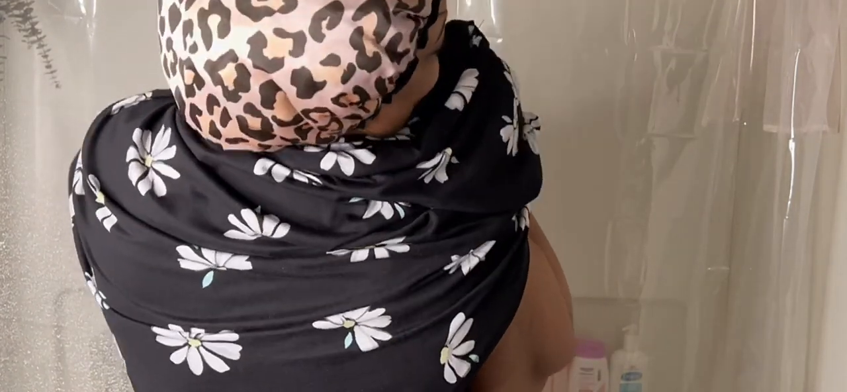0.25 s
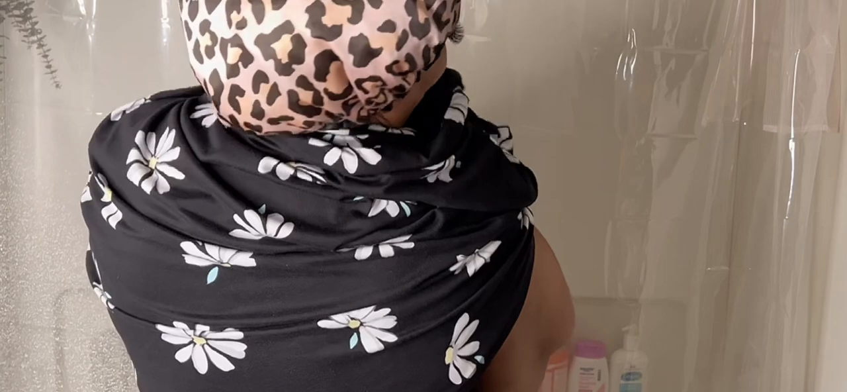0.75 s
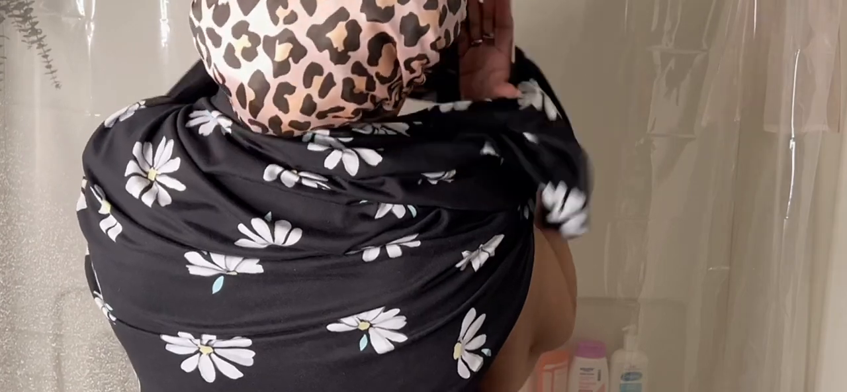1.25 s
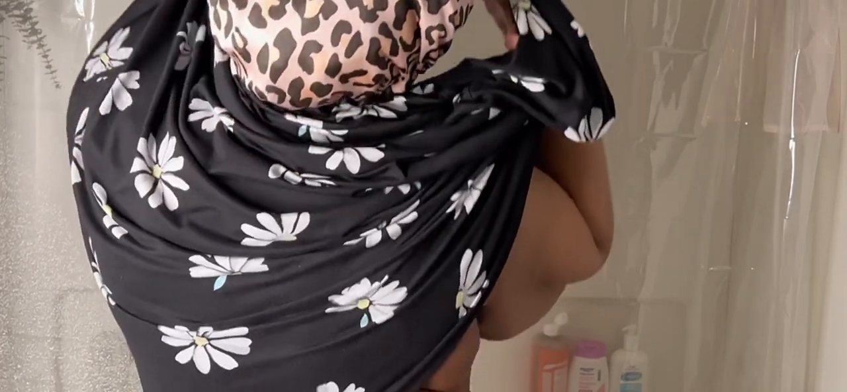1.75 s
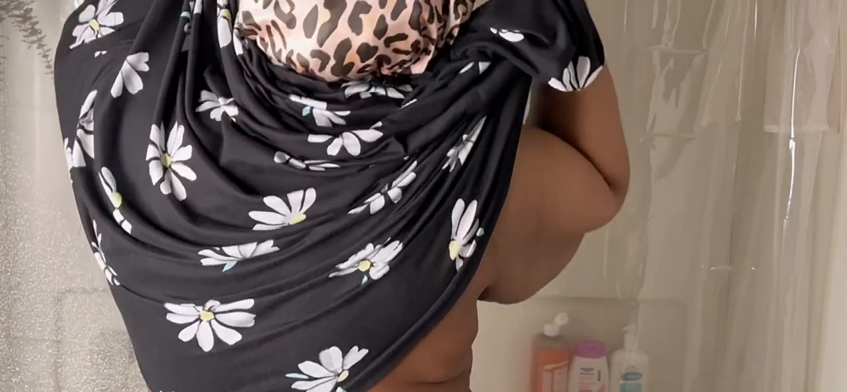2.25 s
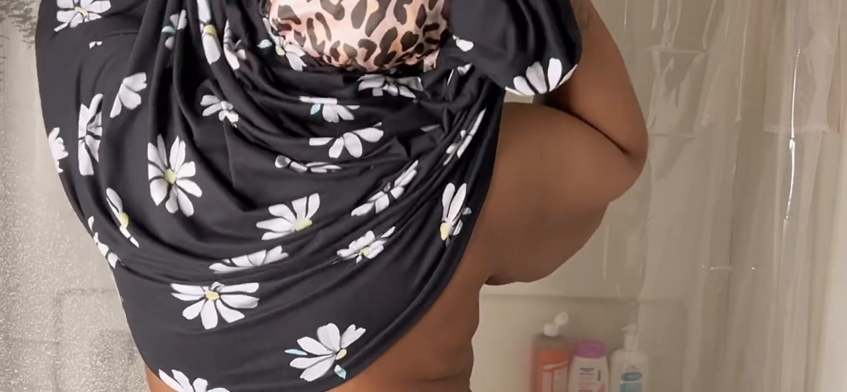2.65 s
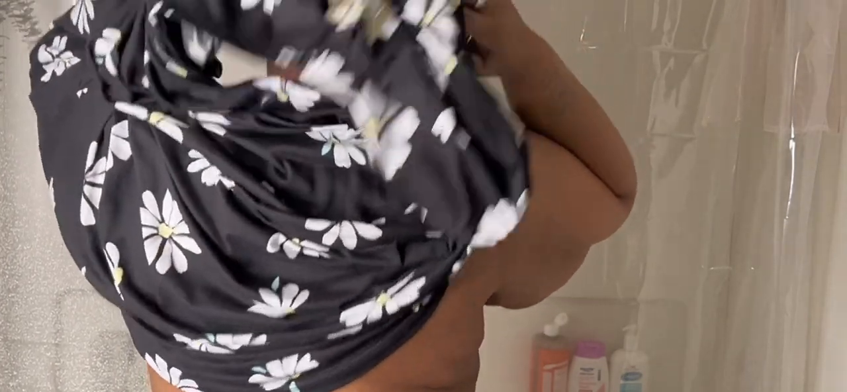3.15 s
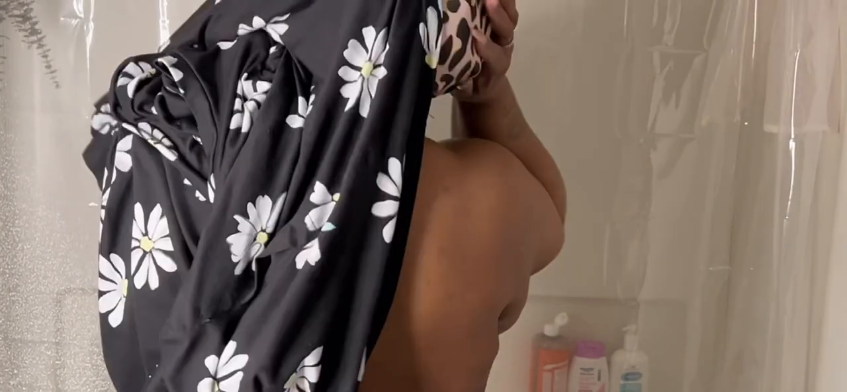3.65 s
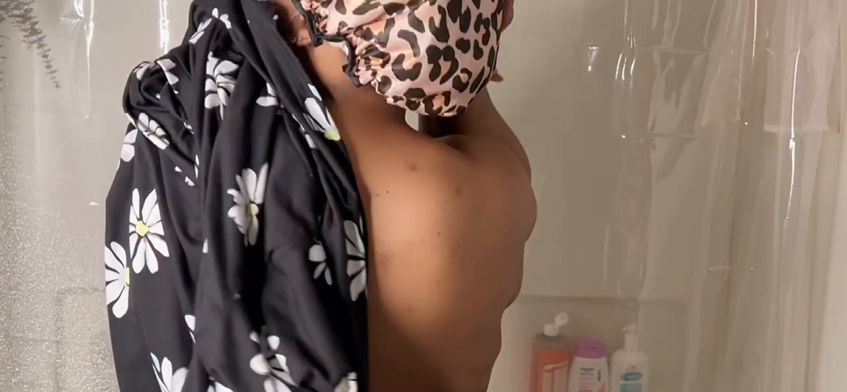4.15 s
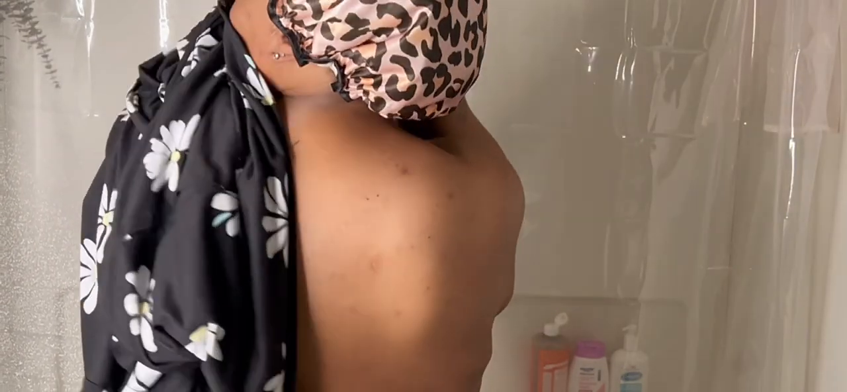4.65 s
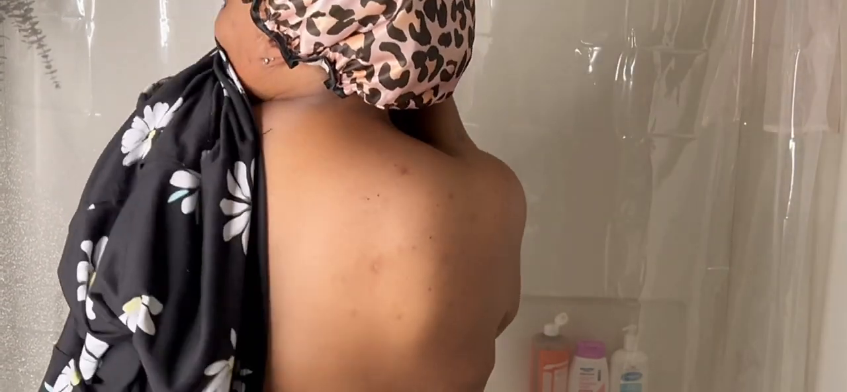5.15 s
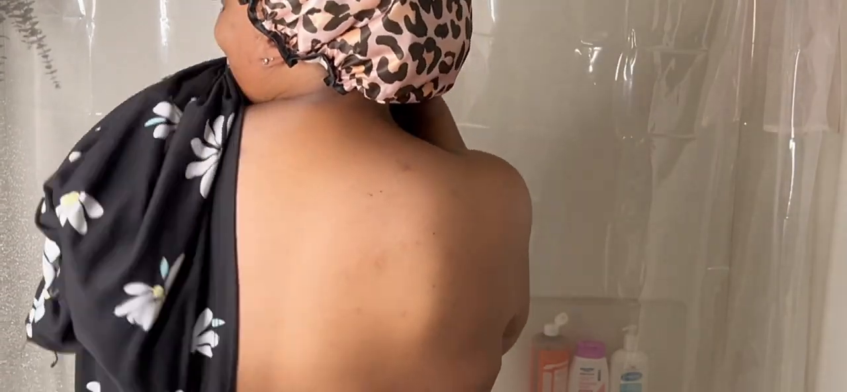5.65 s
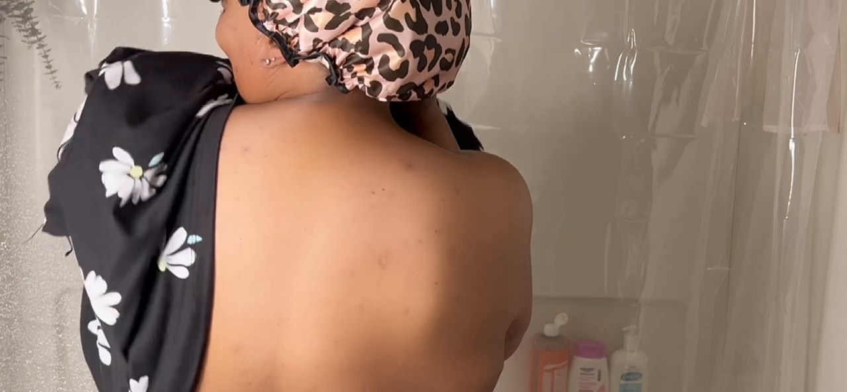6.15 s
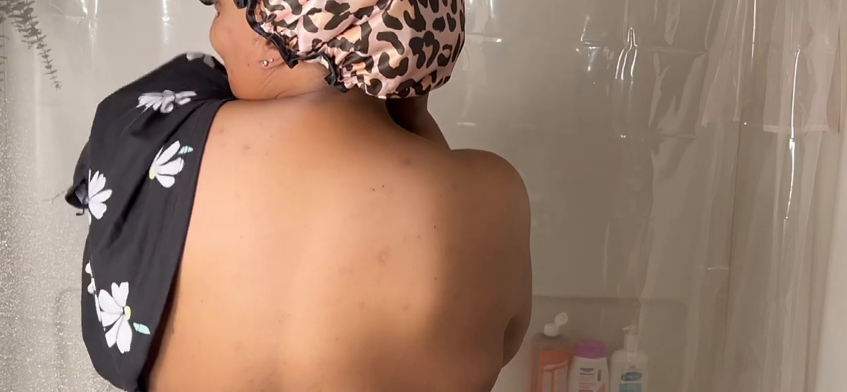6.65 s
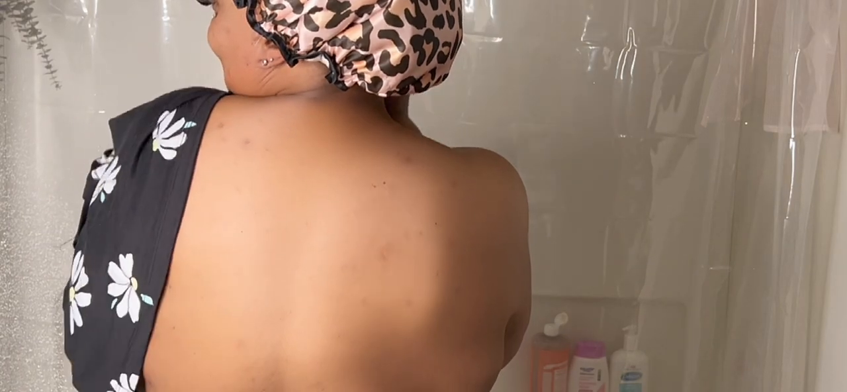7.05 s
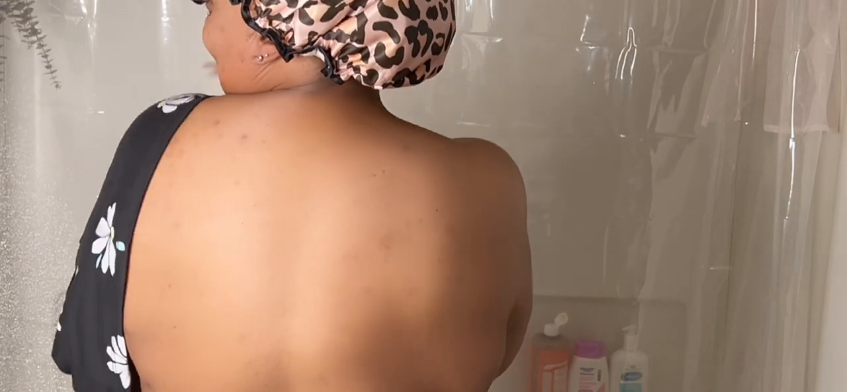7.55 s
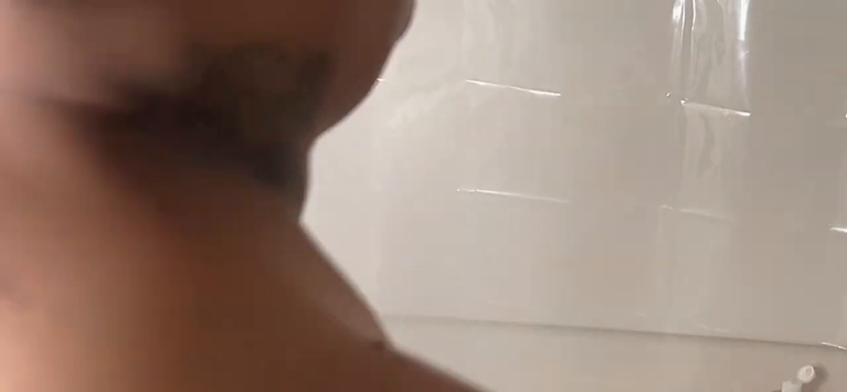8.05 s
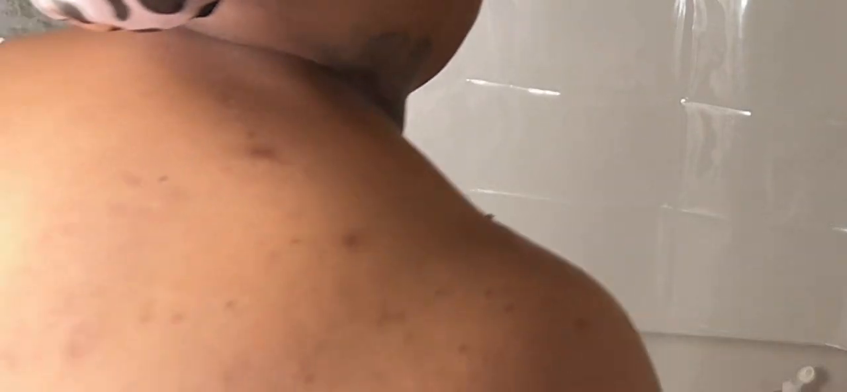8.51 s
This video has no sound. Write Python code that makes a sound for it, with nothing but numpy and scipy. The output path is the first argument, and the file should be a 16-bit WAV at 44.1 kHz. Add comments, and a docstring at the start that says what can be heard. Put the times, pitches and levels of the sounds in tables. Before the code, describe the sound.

Steady shower water drums and fizzes in a tub enclosure until it stops abruptly; after a silent gap, faint room hiss and two small drips.

```python
"""A shower runs in a small hard-walled bathroom: random drop impacts ring modes of tub and stall,
patter as shaped noisy clicks on the curtain and fizz on wet surfaces as crackle and tiny bubbles.
Now and then a bubble plips, or a splash climbs in pitch as it fades; one knock sounds on the tub.
The sound stops dead; after a silence there is only a faint, grainy hiss with two tiny drips."""
import sys
import numpy as np
from scipy import signal
from scipy.fft import rfft, irfft, next_fast_len
from scipy.io import wavfile

SR = 44100
rng = np.random.default_rng(int(sys.argv[2]) if len(sys.argv) > 2 else 0)


def output_pcm(signal):
    """Save a mono or channel-first signal as 16-bit PCM at the path in sys.argv[1].

    Samples are clipped to [-1, 1] before scaling.
    """
    pcm = np.clip(np.atleast_2d(signal).T, -1, 1) * 32767
    wavfile.write(sys.argv[1], SR, np.round(pcm).astype(np.int16))


N = 387188
TIME = np.arange(N) / SR
SIZE = next_fast_len(N + SR // 2, real=True)
HZ = np.maximum(np.arange(SIZE // 2 + 1) * SR / SIZE, 1)
STOP_S, AIR_START_S = 7.857, 8.657
STEP = 32   # samples per step of a splash envelope


def from_db(db):
    """Decibels to amplitude gain."""
    return 10 ** (np.asarray(db) / 20)


def rms_one(x):
    """Scale to unit power."""
    return x / np.sqrt(np.mean(x ** 2) + 1e-20)


def over_hz(points):
    """Read a table at every frequency, on a log axis."""
    hz, value = np.transpose(points)
    return np.interp(np.log(HZ), np.log(hz), value)


def level_over_time(level_points):
    """Gain interpolated in dB from columns time_s, level_db."""
    time_s, level_db = level_points
    return from_db(np.interp(TIME, time_s, level_db))


def band_shares(centres_hz):
    """Crossfading band weights that sum to 1 at every frequency."""
    for share in np.eye(len(centres_hz)):
        yield np.interp(np.log(HZ), np.log(centres_hz), share)


def panned(left_minus_right_db):
    """Left and right gains for a level difference, at constant power."""
    gains = from_db(np.array([[.5], [-.5]]) * left_minus_right_db)
    return gains / np.sqrt(np.mean(gains ** 2, axis=0))


def resonance(hz, width_hz):
    """Power response of one mode, 1 at its top."""
    return 1 / (1 + ((HZ ** 2 - hz ** 2) / (HZ * width_hz)) ** 2)


# likeness of the two microphone ports, long waves reach both alike: pitch_hz, likeness [-1..1]
PORT_LIKENESS = [(60, 1), (150, 0.81), (240, 0.9), (320, 0.93), (420, 0.39), (550, 0.32), (750, -0.18),
                 (1200, 0.27), (1600, -0.25), (2500, -0.03)]
PORT_LAG_S = .000252


def at_ports(pair, response, beamed=0):
    """Colour two unrelated signals and blend them at the ports; a beamed part reaches the left later."""
    right, other = rfft(pair, SIZE)
    lagged = beamed * np.exp(-2j * np.pi * HZ * PORT_LAG_S)
    shared = over_hz(PORT_LIKENESS) + lagged
    unshared = np.sqrt(np.clip(1 - abs(shared) ** 2, 0, 1))
    left = shared * right + unshared * other
    return rms_one(irfft(np.array([left, right]) * response, SIZE)[:, :N])


def drops(per_s, spread_db):
    """Impacts at random moments, their sizes scattered in dB within two spreads."""
    sizes = from_db(spread_db * np.clip(rng.standard_normal(N), -2, 2))
    return sizes * (rng.random(N) < per_s / SR)


def impacts(per_s, spread_db, wash_db):
    """Two streams of drop clicks, each in a smooth noise wash that stands for its echoes."""
    clicks = np.array([drops(per_s, spread_db) for side in range(2)])
    clicks *= rng.choice([-1, 1], (2, N))
    return rms_one(clicks) + from_db(wash_db) * rng.standard_normal((2, N))


def drummed(modes, skirt_hz, per_s):
    """Drops drum on a body; its modes ring, and little passes far from them."""
    power = 0
    for hz, width_hz, db, left_minus_right_db in modes:
        peak = resonance(hz, width_hz) * resonance(hz, skirt_hz)
        power = power + peak * (from_db(db) * panned(left_minus_right_db)) ** 2
    return at_ports(impacts(per_s, spread_db=3, wash_db=0.0), np.sqrt(power))


def wander(pole_hz, spread_db):
    """A gain that strays at random about 1, as the jets shift: low-passed noise in dB."""
    count = SR // 100   # samples per control step
    r = np.exp(-2 * np.pi * pole_hz * count / SR)
    noise = rng.standard_normal(N // count + 202)
    slow = signal.lfilter([1], [1, -2 * r, r * r], noise)[200:]   # settled part only
    path = np.interp(np.arange(N) / count, np.arange(len(slow)), rms_one(slow))
    return from_db(spread_db * path)


def restless(x, pole_hz, spread_db):
    """The jets land on ever different spots, so each range of pitch swells and sinks by itself."""
    spectrum = rfft(x, SIZE)
    out = 0
    for share in band_shares(np.geomspace(500, 4000, 8)):
        out = out + wander(pole_hz, spread_db) * irfft(spectrum * share, SIZE)[:, :N]
    return out


# the drumming on floor, walls and stall briefly swells or sinks:
# top_s, length_s, floor_db, wall_db, stall_db
DRUMMING_ARCHES = [(0.81, 0.16, 2, 2, 1.5), (1.129, .3, 1, 2.5, -0.5), (1.583, 0.35, -1, 0.5, 3.5),
                   (2.3, 0.44, 0, -1, -2.5), (2.72, 0.96, 1.5, -1.5, 1.5), (3.5, 0.54, 2, 1.5, -0.5),
                   (4.942, 0.24, 2.5, 0, 2), (5.114, 0.17, 2, 0.5, 0), (5.355, 0.14, -0.5, 3.5, 0),
                   (6.61, 0.16, 3, -3.5, 0.5), (7.4, .3, 3.5, 1, -1)]


def drumming_arches():
    """Gains of floor, walls and stall, each moved up or down in smooth arches."""
    total_db = 0
    for top_s, length_s, *dbs in DRUMMING_ARCHES:
        arch = np.cos(np.pi * np.clip((TIME - top_s) / length_s, -.5, .5)) ** 2
        total_db = total_db + np.outer(dbs, arch)
    return from_db(total_db)


# level of the drumming on the tub, before the arches: time_s, floor_boom_db, wall_ring_db
TUB_LEVELS = [(0, -46.5, -42), (1.4, -48.5, -43), (2.0, -46.5, -42), (3.5, -46.5, -43), (4.2, -48.5, -42),
              (4.9, -47, -42.5), (5.7, -48, -42.8), (7.8, -47, -42.5)]
# low modes of the tub floor and the room: pitch_hz, width_hz, relative_db, left_minus_right_db
TUB_FLOOR_MODES = [(46.6, 3.5, -2, 1), (71.8, 3.6, 4, -2), (87.3, 20, -4, -4.5), (119.6, 2.6, -6.5, -7.5),
                   (140, 18, -4.5, -4.5)]
# modes of the tub walls and the stall: pitch_hz, width_hz, relative_db, left_minus_right_db
TUB_WALL_MODES = [(216, 7.3, -1.5, 2), (227.5, 9, -3, 1), (236.9, 8, 3, -1), (297, 24, -6, -2.5),
                  (322.5, 17, -5.5, 1), (370.6, 11, -3, -10), (393, 15, -8, 0.5), (423, 14, -8.5, 3),
                  (433, 15, -3, 1), (494.5, 15, -3.5, 3.5), (505, 10, -9, -4), (536.3, 10.3, -0.5, 0),
                  (564, 16, -10.5, 2.5)]


def tub(floor_gain, wall_gain):
    """Drops excite the low floor modes to a boom and the higher wall modes to a ring."""
    time_s, boom_db, ring_db = np.transpose(TUB_LEVELS)
    boom = level_over_time((time_s, boom_db)) * drummed(TUB_FLOOR_MODES, skirt_hz=40, per_s=1200)
    ring = level_over_time((time_s, ring_db)) * drummed(TUB_WALL_MODES, skirt_hz=90, per_s=1800)
    return floor_gain * boom + wall_gain * ring


# stall resonances, freer as the bather turns aside: time_s, lesser_modes_db, main_mode_db
STALL_LEVELS = [(0, -45, -53), (4.2, -46, -54.5), (4.8, -45.3, -49), (7.8, -44, -49)]
# hollow resonances between the stall walls: pitch_hz, width_hz, relative_db, left_minus_right_db
STALL_LESSER_MODES = [(644, 28, 4, 4.5), (697, 30, -0.5, 3.5), (801, 40, 2, -10), (866, 25, -4.5, -7),
                      (922, 18, 3, -1), (993, 24, 3, -0.5), (1096, 20, 3.5, 0), (1122, 24, 5.5, 0),
                      (1173, 30, 4.5, -5), (1229, 18, 5.5, 3), (1282, 26, 3, 4), (1415, 37, -0.5, 1.5),
                      (1480, 45, 2.5, 1), (1603, 41, 2.5, 3.5), (1725, 28, -1, -3), (1800, 25, -0.5, 0.5),
                      (1908, 23, -2.5, -1), (2233, 44, -6, 2)]
# the one that sings out most: pitch_hz, width_hz, relative_db, left_minus_right_db
STALL_MAIN_MODE = [(1336, 23, 0, 0)]


def stall(stall_gain):
    """Drops ring the resonances between the stall walls, each pitch range wavering by itself."""
    time_s, lesser_db, main_db = np.transpose(STALL_LEVELS)
    lesser = drummed(STALL_LESSER_MODES, skirt_hz=159.6, per_s=1500)
    main = drummed(STALL_MAIN_MODE, skirt_hz=120, per_s=1500)
    hollow = level_over_time((time_s, lesser_db)) * lesser
    hollow += level_over_time((time_s, main_db)) * main
    return stall_gain * restless(hollow, pole_hz=15, spread_db=1.3)


# spectrum of the patter: pitch_hz, relative_db
PATTER_SPECTRUM = [(20, -24), (60, -5), (180, -6.5), (350, 0), (560, -3), (720, 1.5), (900, -3),
                   (1150, -3.5), (1350, -2), (1750, -1), (2400, -4.5), (3300, -8.5), (5000, -12.5),
                   (9000, -49)]
# patter and fizz at the two ports: pitch_hz, left_minus_right_db
PORT_BALANCE = [(600, 3), (800, -2), (1100, 4.5), (2400, 0), (4200, 3.5), (5400, 9.5), (6900, 9.5),
                (8200, 5.5), (9200, -0.5)]
PATTER_DB = -41   # before the wandering


def patter():
    """Dense soft taps on the curtain and the film of water, straying in level and colour."""
    clicks = impacts(per_s=1600, spread_db=3.5, wash_db=5.0)
    taps = at_ports(clicks, from_db(over_hz(PATTER_SPECTRUM)) * panned(over_hz(PORT_BALANCE)))
    taps = from_db(PATTER_DB) * wander(pole_hz=9.8, spread_db=0.5) * taps
    return restless(taps, pole_hz=15, spread_db=1.77)


def spatter(per_s, small_db, spread_db):
    """Small splashes or bubbles at random, as rows start_s, pitch_hz, level_db."""
    wait, pitch, size = rng.random((4000, 3)).T
    start_s = np.cumsum(-np.log(1 - wait)) / per_s
    pitch_hz = 2300 * 2 ** (2.7 * pitch)
    level_db = small_db + spread_db * size ** 2
    return np.column_stack([start_s, pitch_hz, level_db])[start_s < STOP_S]


def bubble(hz, db, t60_cycles, glide):
    """One bubble rings out over so many cycles, rising in pitch as it reaches the surface."""
    turns = hz * TIME[:SR // 20]
    fade = from_db(db - 60 * turns / t60_cycles)
    return fade * np.sin(2 * np.pi * turns * (1 + glide * turns / t60_cycles))


def plinks(per_s, t60_cycles):
    """Tiny bubbles ring at pitches of their own, each reaching the two ports differently."""
    out = np.zeros((2, N + SR))
    bubbles = spatter(per_s, small_db=0, spread_db=6)
    reaches = rng.standard_normal((len(bubbles), 2, 1))
    for (start_s, hz, db), reach in zip(bubbles, reaches):
        ring = bubble(hz, db, t60_cycles, glide=0.053)
        start = int(start_s * SR)
        out[:, start:start + len(ring)] += reach * ring
    return rms_one(out[:, :N])


SPLASH_CLIMB_OCTAVES_PER_S = 3.2   # a splash breaks into ever finer drops


def in_room(splashes, centres_hz, rise_s):
    """Energy per band and step: a splash flares, then climbs as it dies away between the walls."""
    energy = np.zeros((len(centres_hz), (N + SR) // STEP))
    t = TIME[:SR // 2:STEP]
    for start_s, hz, db, width_octaves, t60_s in splashes:
        away_octaves = np.log2(centres_hz[:, None] / hz) - SPLASH_CLIMB_OCTAVES_PER_S * t
        near = np.exp(-.5 * (away_octaves / width_octaves) ** 2)
        tail = (1 - np.exp(-(t / rise_s) ** 2)) * 10 ** (-6 * t / t60_s)
        start = int(start_s * SR / STEP)
        energy[:, start:start + len(t)] += from_db(db) ** 2 * near * tail / tail.max()
    return energy


# big splashes: start_s, centre_hz, relative_db, width_octaves, t60_s
BIG_SPLASHES = [(.219, 7570, -0.5, .3, .15), (.358, 5400, 3, .42, .27), (.612, 6530, -4, .7, .25),
                (1.388, 3610, 2.5, .35, .18), (1.743, 4600, 8, .15, .15), (2.023, 3510, 6.5, 0.12, .16),
                (2.054, 9200, 3, 0.17, .3), (2.238, 5300, -0.5, .35, .2), (2.284, 12300, 4.5, 0.22, .28),
                (2.735, 8300, 3.5, 0.11, .4), (2.940, 4900, 1, 0.3, 0.6), (3.090, 2900, 5, 0.11, .12),
                (3.143, 4750, 4, .28, .14), (3.376, 5450, 3.5, 0.25, .3), (3.430, 7520, -1, 0.25, .3),
                (3.701, 8400, 1.5, .3, .22), (3.795, 12500, -0.5, .3, .5), (3.975, 3200, 4, .15, .13),
                (3.991, 11040, 0.5, .7, .3), (4.058, 6500, -1.5, 0.89, .3), (4.115, 4250, 7, 0.14, .18),
                (4.257, 7500, 7, .17, .3), (4.361, 3250, 9, .13, .13), (4.680, 4900, 4.5, 0.11, .17),
                (4.921, 6970, 1, 0.12, .2), (5.438, 11530, 3, 0.25, .26), (5.462, 5480, -3, .6, .25),
                (5.736, 7000, -5, 0.44, .45), (5.778, 10070, -1.5, .15, .5), (6.250, 7030, -0.5, 0.42, .65),
                (6.412, 7200, 0, 0.27, .27), (6.772, 12800, 1.5, .12, .15), (7.282, 6300, 4.5, 0.18, .22),
                (7.284, 10000, -1.5, 0.7, .3), (7.305, 2800, 3.5, .5, .2)]
DROPLET_OCTAVES, ROOM_T60_S = 0.45, 0.2   # small splashes


def splashing():
    """Showers of droplets, small at random and big as listed, flare band by band."""
    centres_hz = np.geomspace(2000, 16000, 16)
    droplets = spatter(per_s=110, small_db=-11.5, spread_db=7.5)
    droplets = [(*row, DROPLET_OCTAVES, ROOM_T60_S) for row in droplets]
    energy = in_room(droplets, centres_hz, rise_s=0.022) + in_room(BIG_SPLASHES, centres_hz, rise_s=0.008)
    swells = np.repeat(np.sqrt(energy), STEP, axis=1)[:, :N]
    shower = rfft(rms_one(impacts(per_s=2200, spread_db=2.5, wash_db=4)), SIZE)
    out = np.zeros((2, N))
    for share, swell in zip(band_shares(centres_hz), swells):
        out += swell * irfft(shower * share, SIZE)[:, :N]
    return out


# spectrum of the fizz: pitch_hz, relative_db
FIZZ_SPECTRUM = [(1000, -30), (2200, -10), (3200, -6), (4300, -5), (5500, -.5), (6800, 0), (8200, -2.4),
                 (9300, -2.7), (10000, -3.6), (11100, -1), (12400, -5), (13500, -5.7), (15000, -3),
                 (16000, -3)]
# the top of the hiss comes from one side: pitch_hz, likeness [0..1]
BEAMED_TOP = [(7800, 0.049), (9000, 0.026), (9900, 1)]
# the treble sags now and then: time_s, offset_db
FIZZ_SAGS = [(0, 0), (.42, -0.5), (.5, -2.5), (.62, 0), (.97, -1.4), (1.1, -0.5), (3.85, -0.46), (4.4, -1),
             (4.6, -2), (4.85, -1), (6.4, -0.5), (6.6, -1.5), (6.9, -1), (7.8, -1)]
FIZZ_DB = -35   # before the sags
MIST_DB, PLINK_DB = -4.5, -19   # within the fizz mix; the bubbles stay inside it


def fizz():
    """Fine mist crackles evenly, bubbles plink and splashes flare, under one treble spectrum."""
    mist = rms_one(impacts(per_s=3500, spread_db=2.5, wash_db=2.5))
    mix = from_db(MIST_DB) * mist + from_db(PLINK_DB) * plinks(per_s=220, t60_cycles=310)
    mix += splashing()
    response = from_db(over_hz(FIZZ_SPECTRUM)) * panned(over_hz(PORT_BALANCE))
    sags = level_over_time(np.transpose(FIZZ_SAGS))
    return from_db(FIZZ_DB) * sags * at_ports(mix, response, over_hz(BEAMED_TOP))


# larger bubbles inside a splash: start_s, pitch_hz, level_db (before decay and panning)
LARGE_BUBBLES = [(1.755, 4600, -44.5), (3.096, 2800, -38), (4.119, 4300, -35.5), (4.364, 3080, -43)]


def plips(t60_cycles, glide, left_minus_right_db):
    """The few bubbles big enough to be heard one by one."""
    out = np.zeros(N + SR)
    for start_s, hz, db in LARGE_BUBBLES:
        ring = bubble(hz, db, t60_cycles, glide)
        start = int(start_s * SR)
        out[start:start + len(ring)] += ring
    return out[:N] * panned(left_minus_right_db)


# a slug of water knocks on the tub: start_s, pitch_hz, level_db (before rise and decay)
WATER_SLUG = (5.078, 440, -30.5)


def knock(rise_s, t60_s):
    """One wall mode swells under a soft blow and rings out."""
    start_s, hz, db = WATER_SLUG
    age = np.clip(TIME - start_s, 0, 2 * t60_s)
    swell = 1 - np.exp(-(age / rise_s) ** 2)
    return swell * from_db(db - 60 * age / t60_s) * np.sin(2 * np.pi * hz * age)


# spectrum of the still room: pitch_hz, relative_db
AIR_SPECTRUM = [(50, -42), (90, -22), (150, 2), (280, 1.5), (400, 1), (600, -2.5), (1400, -3.5), (4000, -9),
                (9000, -11), (15000, -21)]
# last drips: start_s, pitch_hz, level_db (of the ring, before decay)
LAST_DRIPS = [(8.665, 1400, -61), (8.746, 3100, -54)]
AIR_DB = -64.5
DRIP_TICK_DB = -2   # noise relative to the ring; the drip's level_db does not scale it separately


def quiet_room(drip_t60_s):
    """A faint, finely pattering hiss and two short drips, each a landing tick and a brief ring."""
    grains = impacts(per_s=700, spread_db=4, wash_db=3)
    air = from_db(AIR_DB) * at_ports(grains, from_db(over_hz(AIR_SPECTRUM)))
    for start_s, hz, db in LAST_DRIPS:
        age = np.clip(TIME - start_s, 0, 10 * drip_t60_s)
        fade = from_db(-60 * age / drip_t60_s) * (age > 0)
        tick = from_db(DRIP_TICK_DB) * fade * rng.standard_normal(N)
        # tick carries the fade already, so it dies twice as fast as the ring
        air = air + from_db(db) * fade * (np.sin(2 * np.pi * hz * age) + tick)
    return air * np.clip((TIME - AIR_START_S) / 0.014 + .5, 0, 1)


def scene():
    """The voices of the water, stopped dead; later the quiet room."""
    floor_gain, wall_gain, stall_gain = drumming_arches()
    water = tub(floor_gain, wall_gain) + stall(stall_gain)
    water += patter()
    water += fizz()
    water += plips(t60_cycles=200, glide=0.2, left_minus_right_db=5.5)
    water += knock(rise_s=0.018, t60_s=0.22)
    # drops 12 dB at once, then fades within a few hundredths of a second
    after_s = np.clip(TIME - STOP_S, 0, .1)
    running = np.where(after_s > 0, from_db(-12 - 1300 * after_s), 1)
    return water * running + quiet_room(drip_t60_s=0.0073)


MIC_LOW_HZ, CUTOFF_HZ = 37, 15600


def record(dry):
    """The microphone loses the deepest rumble, and the top is cut steeply."""
    low_cut = signal.butter(2, MIC_LOW_HZ, "high", fs=SR, output="sos")
    top_cut = signal.cheby1(12, .05, CUTOFF_HZ, fs=SR, output="sos")
    return signal.sosfiltfilt(top_cut, signal.sosfilt(low_cut, dry))


dry = scene()
out = record(dry)
output_pcm(out)
```